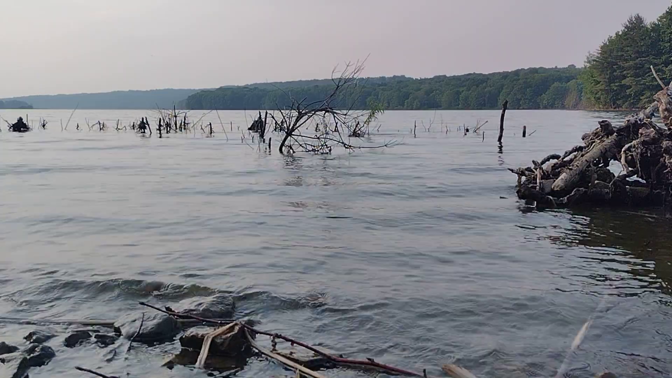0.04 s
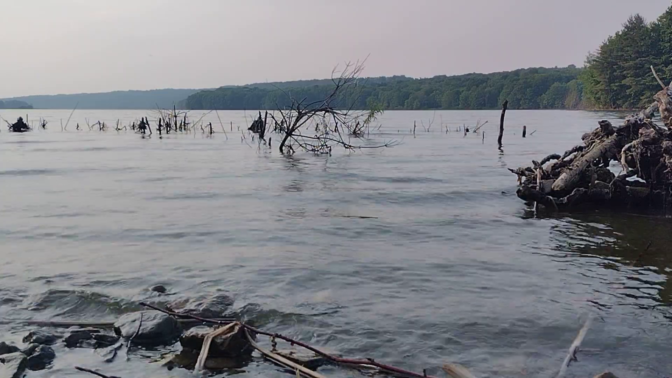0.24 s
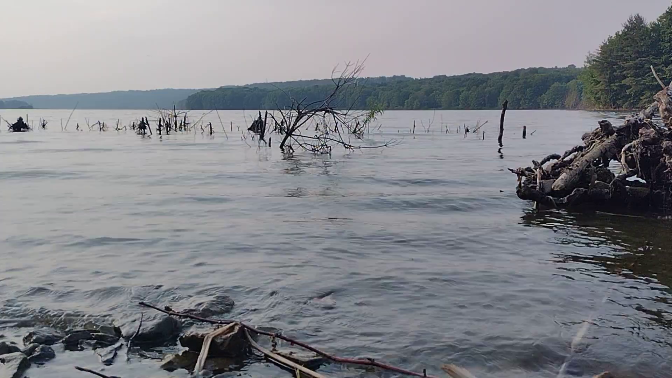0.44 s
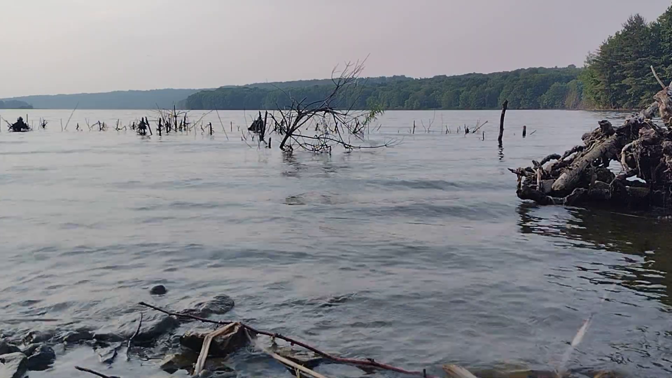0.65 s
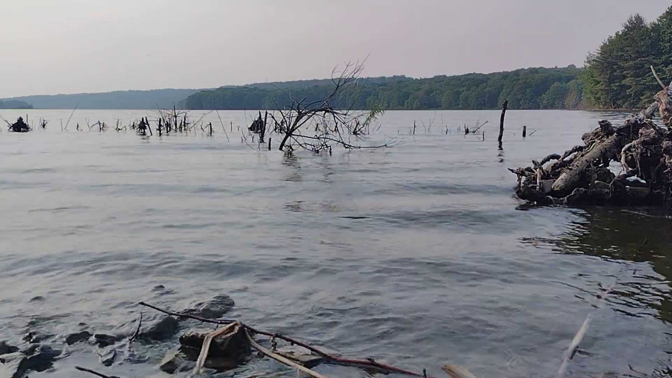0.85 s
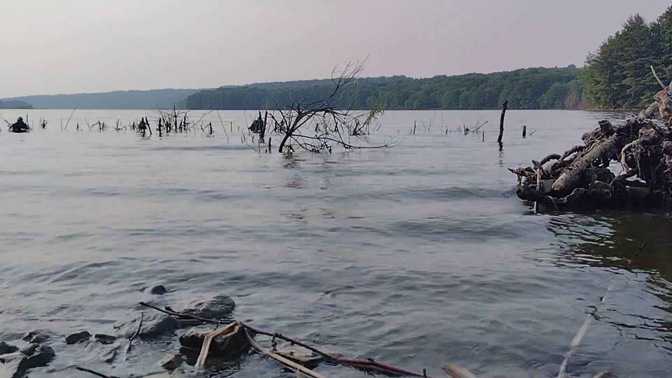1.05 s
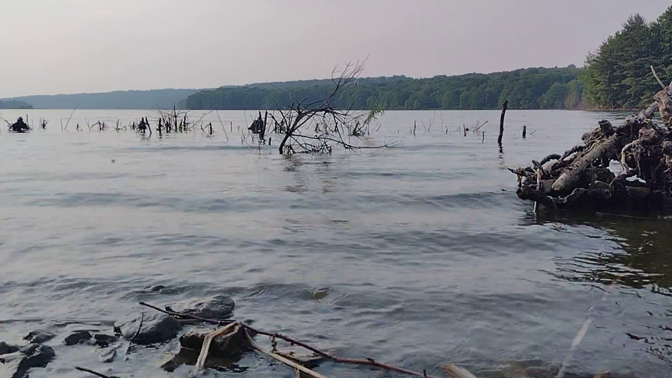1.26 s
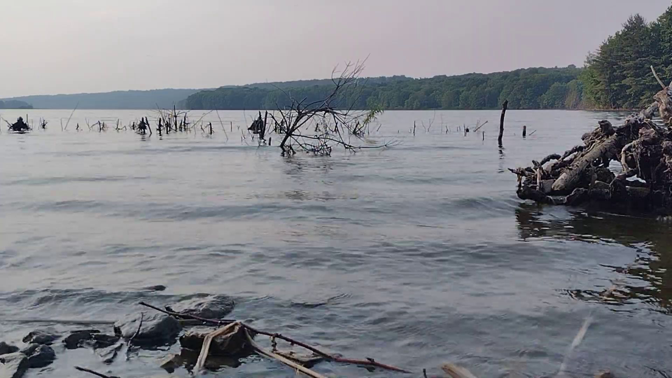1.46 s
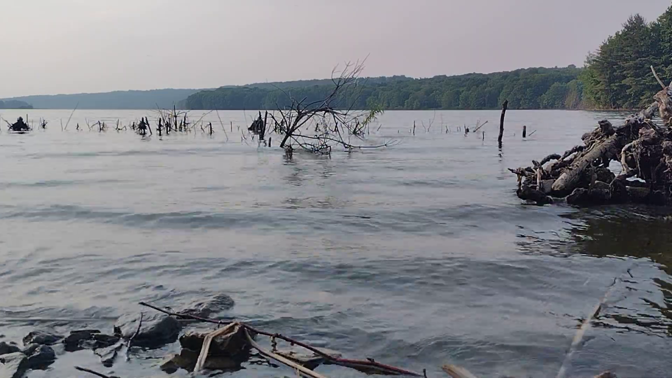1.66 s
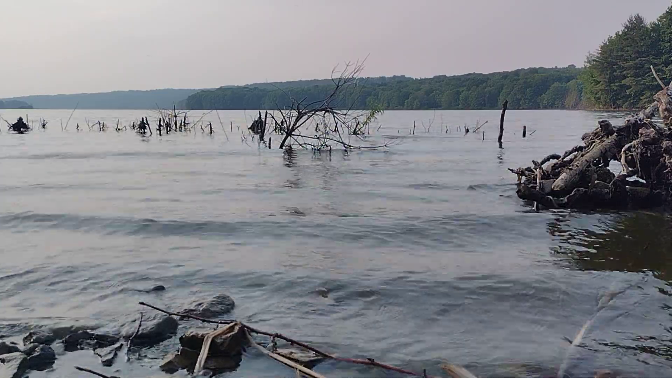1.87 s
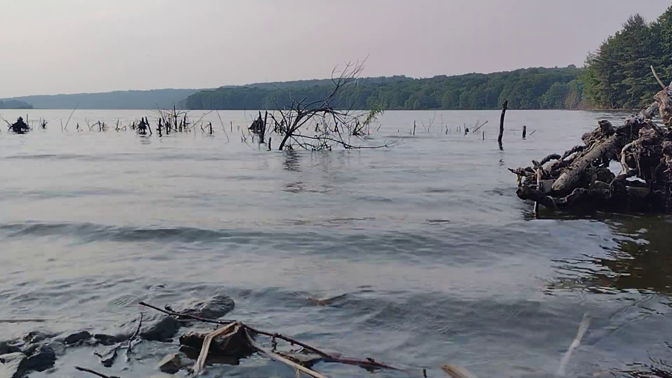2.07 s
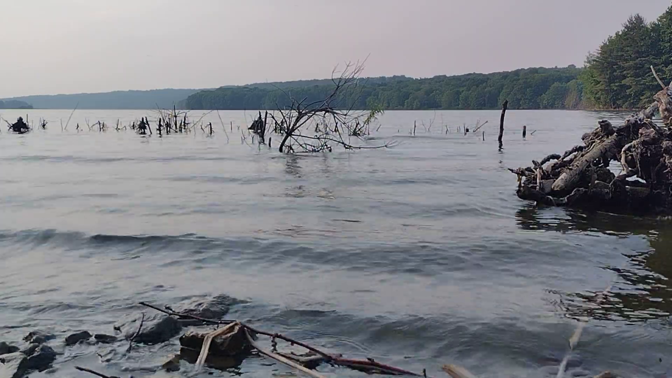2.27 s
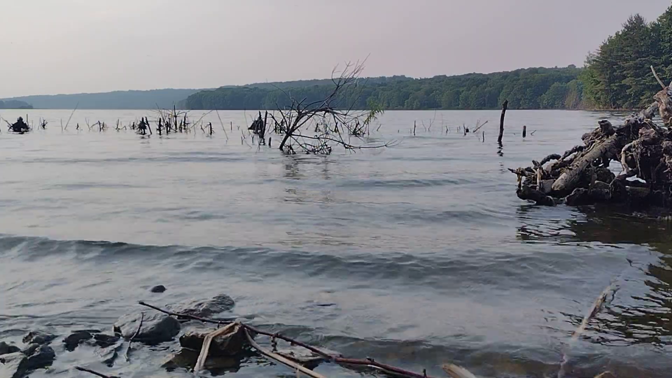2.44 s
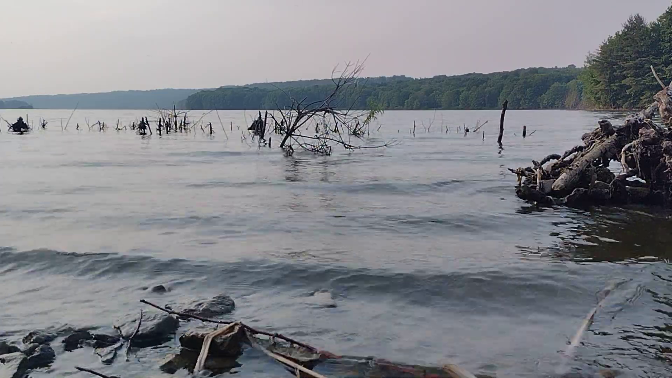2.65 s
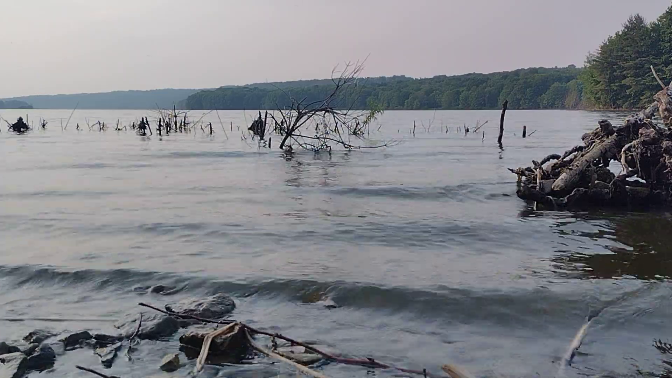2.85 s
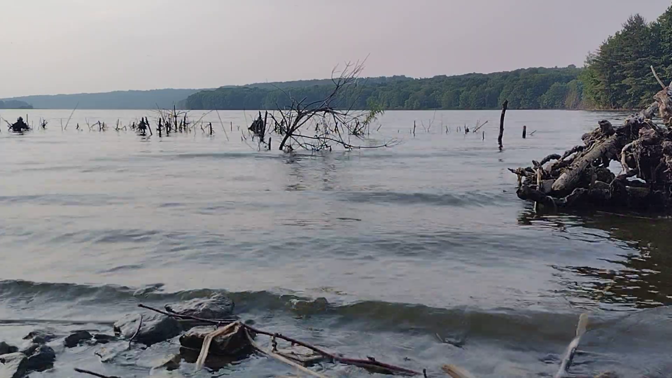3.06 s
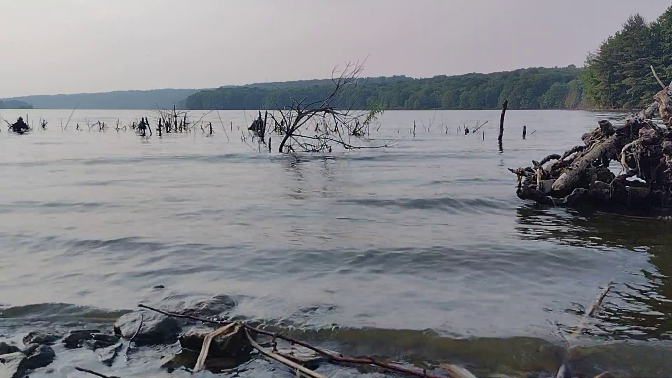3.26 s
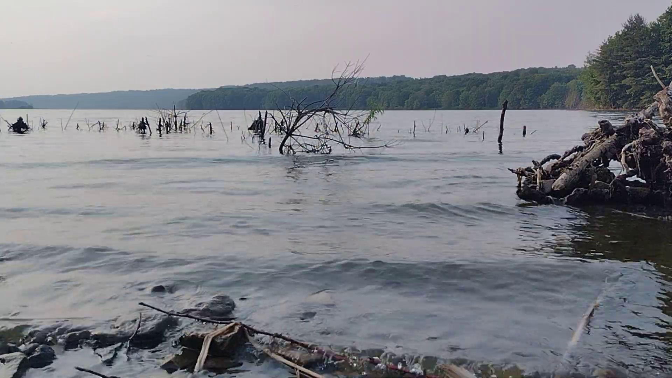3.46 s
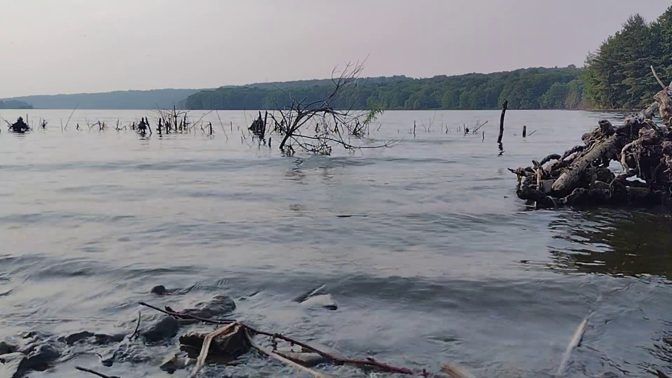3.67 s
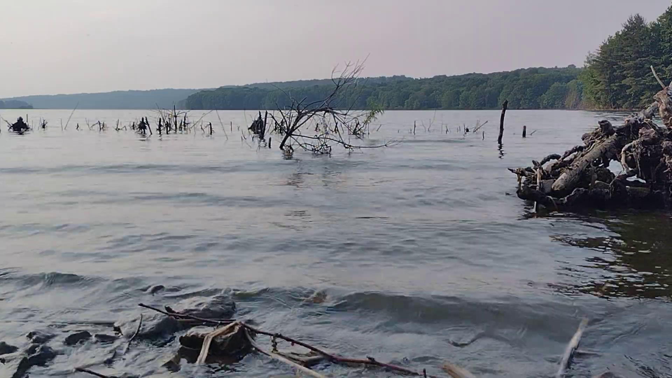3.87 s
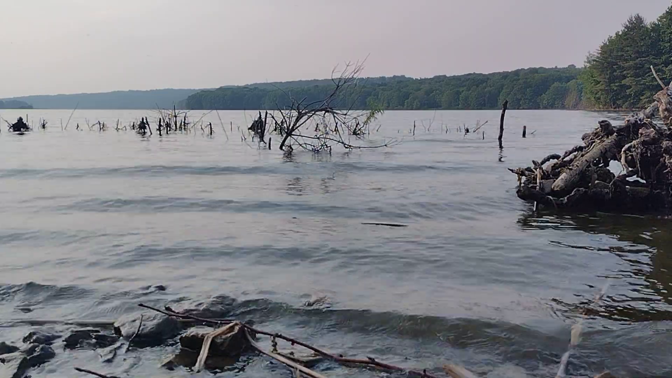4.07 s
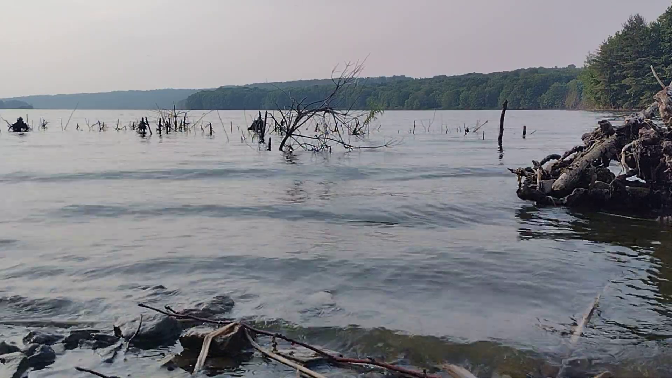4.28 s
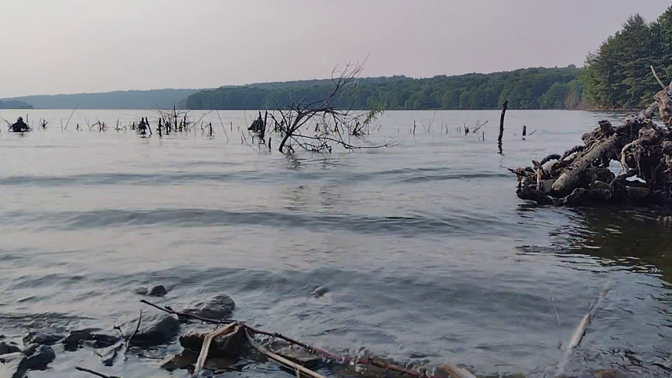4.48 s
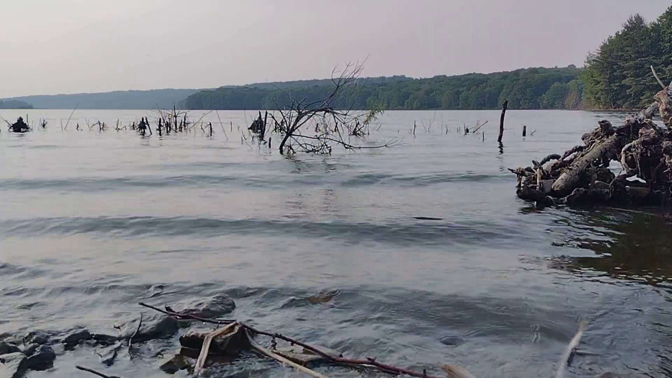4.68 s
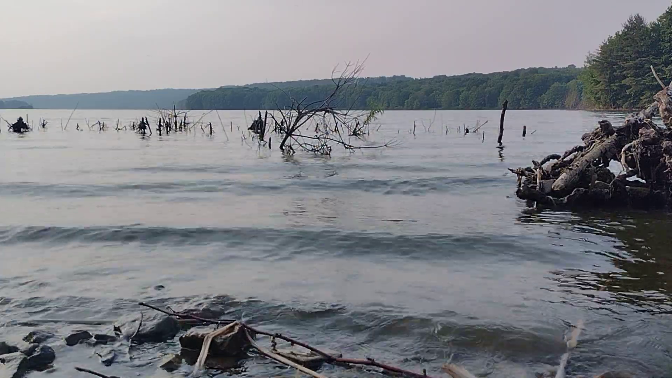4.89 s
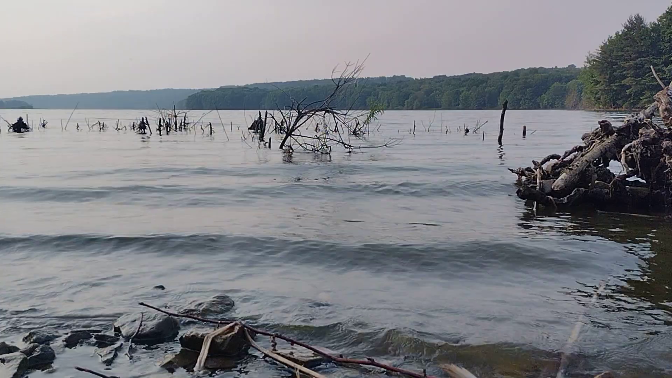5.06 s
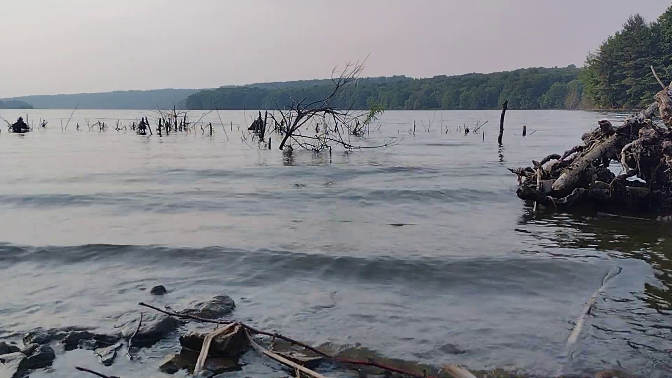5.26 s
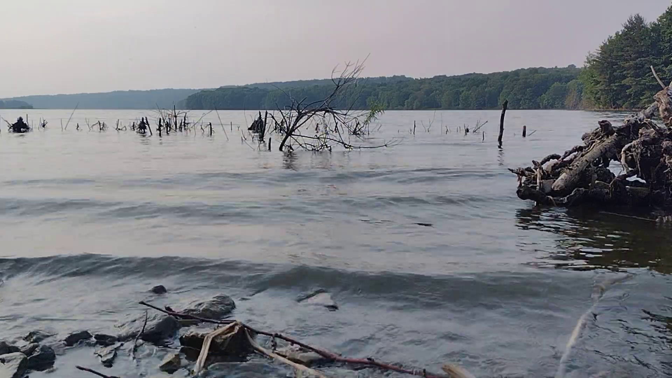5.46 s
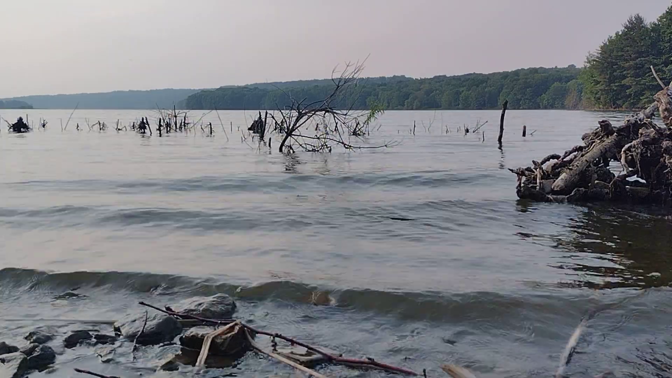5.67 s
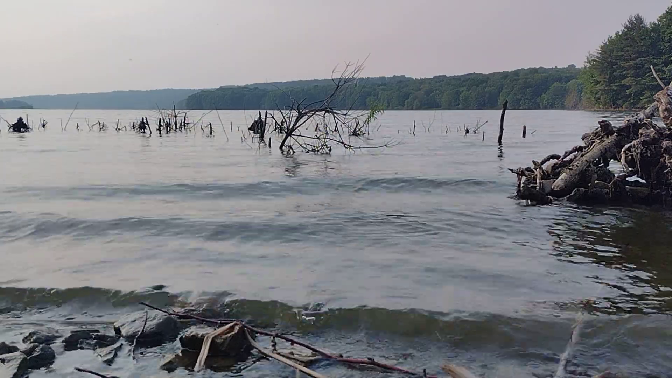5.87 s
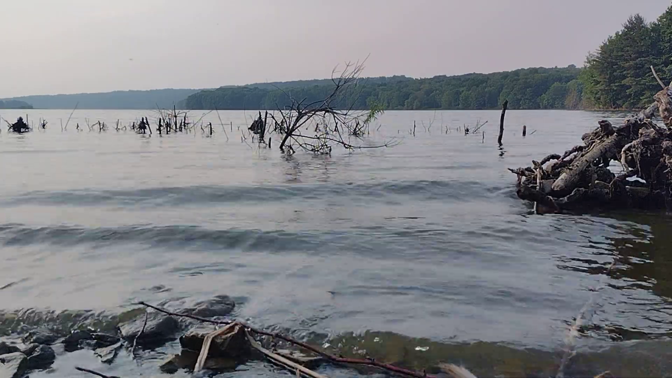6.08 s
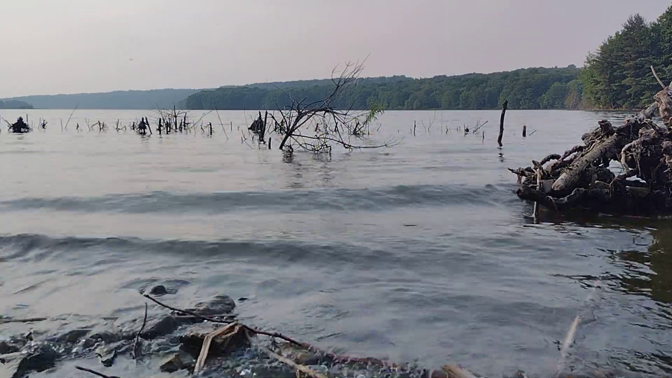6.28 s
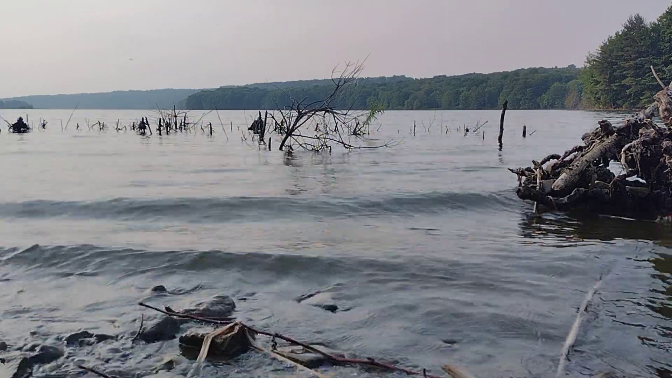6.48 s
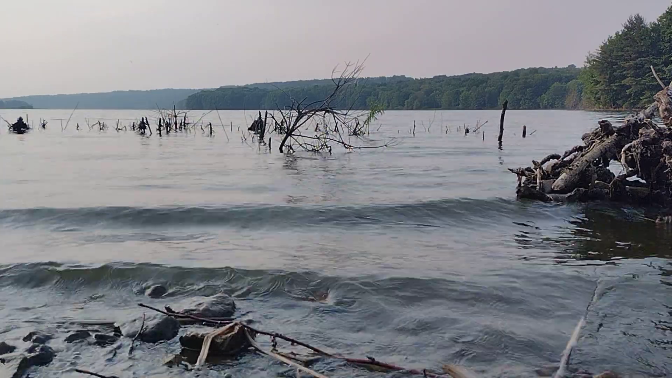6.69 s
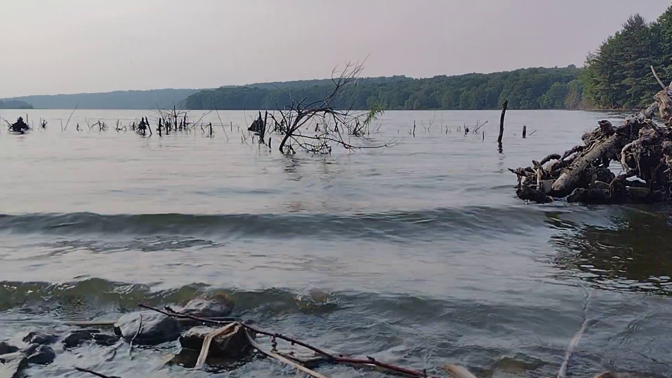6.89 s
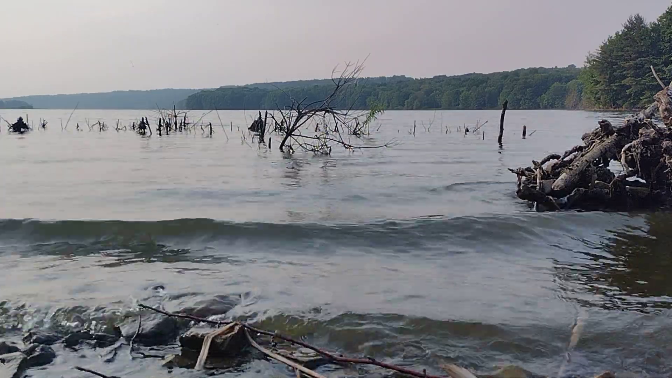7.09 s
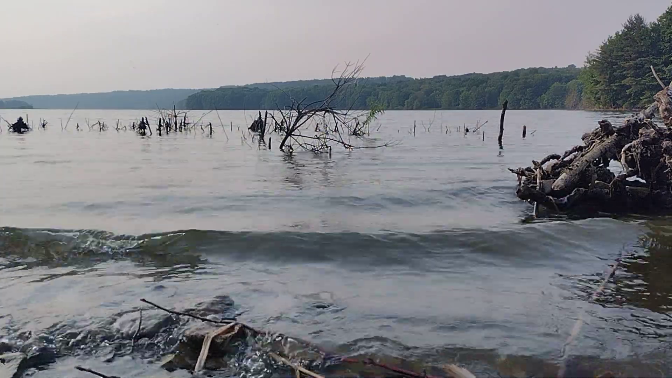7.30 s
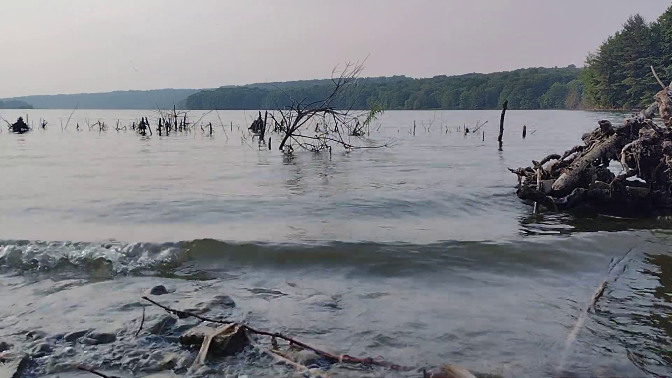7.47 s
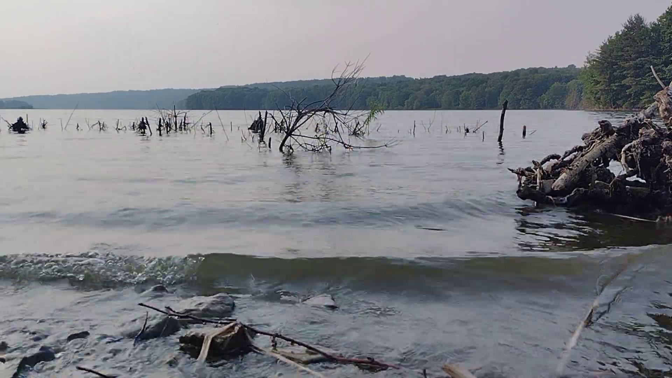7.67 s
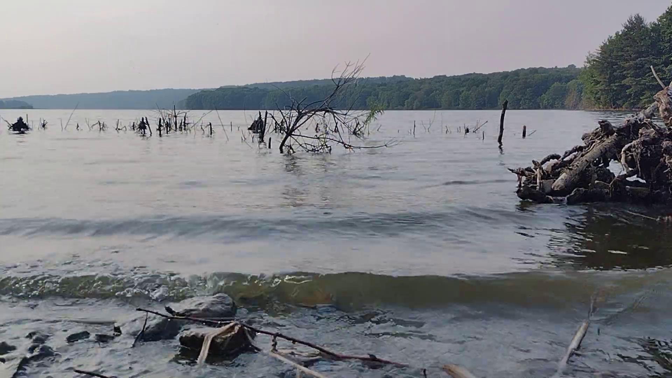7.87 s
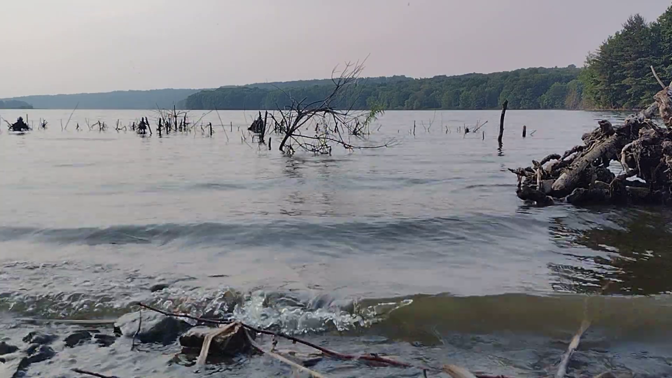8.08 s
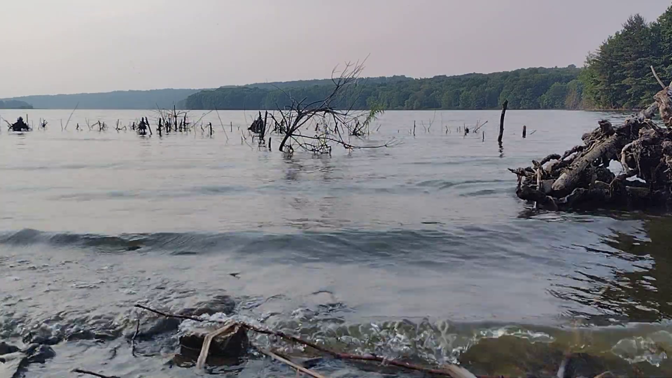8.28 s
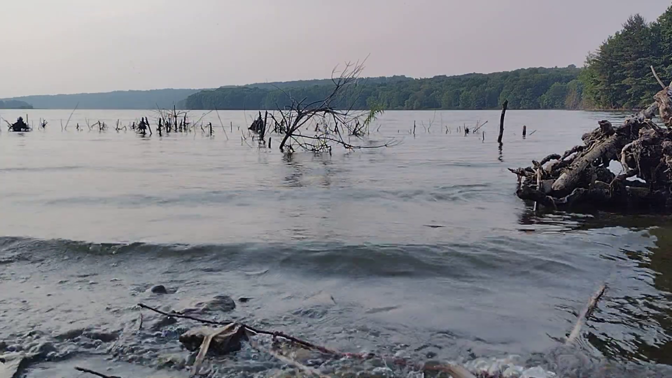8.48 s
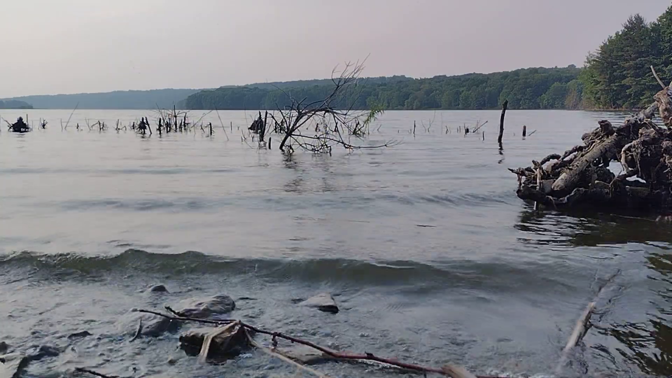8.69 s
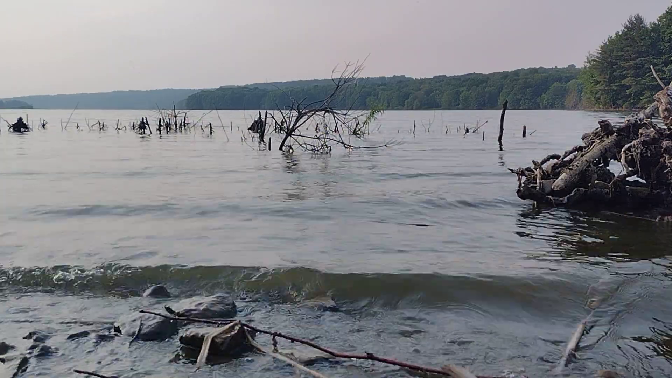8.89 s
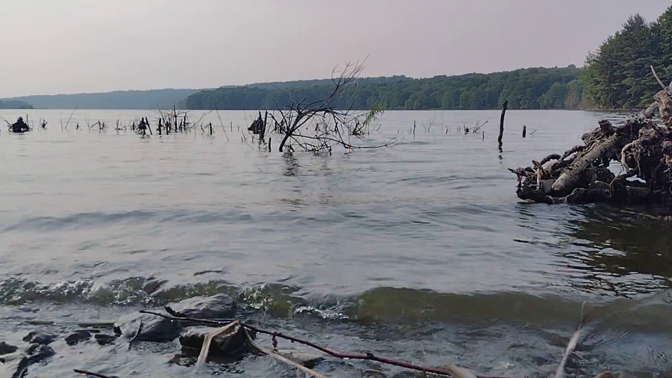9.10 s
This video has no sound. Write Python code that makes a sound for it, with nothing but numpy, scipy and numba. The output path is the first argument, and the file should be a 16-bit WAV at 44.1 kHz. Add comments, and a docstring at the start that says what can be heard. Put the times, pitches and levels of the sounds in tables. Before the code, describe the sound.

A quiet outdoor lakeshore heard from two spaced microphones near the waterline. Nearly still water clicks and drips between stones, with a faint high bird phrase early on. Short laps and rising glugs follow, pause briefly, then grow into busy, bubbly splashing with droplets ticking on rock. Behind it lie a faint unsteady motor drone and a gentle murmur of distant water.

```python
"""On a rocky lake shore, small waves run in close to two spaced microphones: trapped air pockets glug and most
rise in pitch, swarms of small bubbles gurgle and fizz as each wave breaks, and droplets tick on the stone.
Bubbles and droplets are short sines reaching the microphones a little apart in time. Behind them a small bird
calls once in whistled glides, a distant motor hums in two wavering tones over a rumble, and far water murmurs
as shaped noise."""
import sys
import numpy as np
from scipy import signal
from scipy.fft import rfft, irfft, next_fast_len
from scipy.io import wavfile
from numba import njit

SR = 44100
rng = np.random.default_rng(int(sys.argv[2]) if len(sys.argv) > 2 else 0)


def file_out(sig):
    """Save sig as 16-bit WAV at sys.argv[1]."""
    # one column per channel
    cols = np.atleast_2d(sig).T
    # limit, then scale
    lim = np.clip(cols, -1, 1)
    pcm = np.round(lim * 32767).astype(np.int16)
    wavfile.write(sys.argv[1], SR, pcm)


N = 403074

MIC_GAP_MS = 0.47   # time sound takes from one microphone to the other


def waves():
    """Swarms follow the breaking water, single bubbles and droplets stand out; nearby stones echo it all."""
    # the clearest single bubbles: (time of peak [s], swell [ms], fade [ms], start pitch [Hz], end pitch [Hz],
    # peak level [dB], left lag [ms])
    single_bubbles = [(0.399, 1.01, 2.1, 3165, 2972, -57, -.16), (0.524, 4.9, 22, 700, 735, -49.5, 0.58),
                      (0.874, 3, 10, 1140, 1034, -53, .47), (0.885, 4, 3.4, 1880, 1850, -54, 0.33),
                      (0.9, 4.7, 2.1, 2450, 2455, -56, -.15), (0.917, 0.74, 1.2, 3780, 3900, -51, -0.21),
                      (1.169, 3.4, 8.3, 1040, 1110, -51, .47), (1.299, 0.39, 0.94, 1370, 1529, -43, .26),
                      (1.298, 1, 2, 2280, 2326, -61, .22), (1.3, 0.69, 0.96, 4760, 4070, -42.5, 0.3),
                      (1.462, 2, 5.4, 765, 900, -49.5, -0.26), (2.168, 1.05, 1.9, 1550, 1507, -47, 0.23),
                      (2.221, 0.77, 1.2, 5060, 5060, -42, .02), (2.628, 3, 2.1, 2450, 2519, -55, -.17),
                      (2.64, .83, 0.33, 3740, 3860, -47, 0.26), (2.784, 0.9, 8.2, 1390, 1710, -58.5, .1),
                      (2.83, 4, 15, 875, 935, -59.5, -0.098), (2.831, 0.65, 2.4, 2220, 2370, -54.5, .11),
                      (3.165, 19, 14.5, 414, 760, -55.5, -0.32),
                      (3.245, 0.64, .51, 6740, 6460, -47.5, -.16), (3.345, 6.9, 19, 560, 870, -42.5, -0.42),
                      (3.485, 5, 9.5, 1590, 1610, -62, -0.16), (3.539, 2.4, 8.1, 1390, 1470, -55, -.06),
                      (3.545, 5, 12, 770, 910, -50, 0.31), (3.621, 0.61, 4.1, 2530, 2530, -46, -.23),
                      (3.633, 10.5, 8.5, 880, 1480, -51.5, .01),
                      (3.665, 1.01, 4.1, 3260, 3400, -54, 0.00081),
                      (3.693, 0.92, 13, 1292, 1335, -49, -0.47),
                      (3.762, 2.1, 3.5, 2260, 2600, -53.5, 0.014), (3.81, 28, 23, 665, 817, -48, 0.5),
                      (3.815, 3.1, 3.8, 1500, 1740, -50, .32), (3.866, 6.5, 9.4, 1860, 1800, -49, -.27),
                      (3.872, 1.01, 3.3, 2590, 2864, -51, -0.071), (3.923, 2.04, 4, 1637, 1550, -55, 0.27),
                      (4.175, 5.9, 3.4, 930, 1390, -41, -.33), (4.195, 1.2, .51, 6440, 6130, -49.5, .42),
                      (4.388, 5.4, 10, 456, 426, -52, 0.52), (4.41, 3.8, 8.4, 204, 260, -48, .3),
                      (4.521, 1.1, 3.7, 3280, 2780, -50, 0.19), (4.53, 1.3, 8.6, 1490, 1390, -51.5, .2),
                      (4.587, 1.3, 9.1, 1160, 1055, -50, .23), (4.615, 13, 10.6, 770, 1200, -50, -.12),
                      (4.918, 1.2, 2.8, 3340, 3445, -44, -.45), (5.336, 1.3, 13, 1580, 1580, -62, .05),
                      (4.955, 4, 15, 880, 900, -60, 0.23), (5.459, 1.4, 11, 790, 940, -52, 0.021),
                      (5.556, 1.6, 11, 1060, 1300, -51, 0.26), (5.558, 4, 11, 605, 696, -58, .28),
                      (5.68, 2.1, 12, 950, 1050, -63, 0.06), (5.862, 46, 5, 402, 723, -43.5, -.45),
                      (5.876, 5.2, 4.6, 765, 1163, -43, -0.36), (5.914, 15.5, 24, 653, 910, -50, -.4),
                      (5.93, 10.1, 47, 329, 484, -57, -.47), (6.028, 3, 8.7, 1464, 1529, -52, -0.52),
                      (6.04, 13, 34, 375, 400, -53.5, -.31), (6.07, 1.9, 23, 1420, 1380, -53.5, -.06),
                      (6.125, 7.3, 8, 600, 530, -48, -.47), (6.154, 6.9, 7.4, 1070, 1150, -47, -0.26),
                      (6.232, 1.8, 13, 636, 710, -50, 0.25), (6.256, 2.2, 8.6, 827, 780, -38.5, -0.05),
                      (6.282, .79, .51, 6339, 6130, -42, -.34), (6.315, 1.1, 6.1, 3020, 2940, -49, .01),
                      (6.386, 1.8, 24, 864, 1150, -39.5, .06), (6.39, 3.4, 22, 1410, 1530, -44, -0.14),
                      (6.485, 5, 6.3, 710, 765, -46, 0.25), (6.529, 1, .6, 4450, 4760, -41.5, 0.28),
                      (6.586, 17, 5.6, 893, 760, -41.5, 0.4), (6.592, 2.9, 2.4, 440, 507, -38, 0.27),
                      (6.669, 4.6, 3.9, 200, 237, -38.5, 0.24), (6.669, 11.4, 2.1, 416, 473, -43.5, .31),
                      (6.82, 11, 23, 444, 483, -52, 0.4), (6.874, 1.01, .9, 3340, 3430, -38, 0.23),
                      (6.873, 1.7, 2.6, 2200, 2000, -34, .25), (6.882, 0.99, 2.2, 6615, 7028, -44, -.32),
                      (6.899, 1.01, 0.77, 3320, 3180, -23, -0.36),
                      (6.898, 0.58, 1.1, 2700, 2830, -32, -0.29), (6.897, 0.89, 5.2, 6940, 6133, -42, -.34),
                      (6.922, 7.9, 40, 290, 364, -39.5, -.34), (6.935, 4.17, 22, 614, 750, -31, -0.57),
                      (6.939, 0.69, 0.47, 6100, 5560, -33, -0.366),
                      (6.988, 1.2, 11.6, 2660, 2810, -40, -0.34), (6.99, 24, 14.9, 567, 994, -36, 0.079),
                      (6.993, 1.7, 24, 970, 1110, -28, -0.44), (7.005, 1.82, 1.4, 2660, 2880, -38, 0.01),
                      (7.025, 15, 37, 252, 279, -50, -0.35), (7.107, 7.7, 3.3, 595, 674, -34, -0.39),
                      (7.108, 7.2, 84, 384, 943, -36.5, -0.19), (7.182, 5.4, 3, 1480, 1630, -42.5, -.04),
                      (7.207, 4.16, 31, 459, 557, -39.5, -0.11),
                      (7.258, 2.5, 4.4, 1440, 1292, -36.5, -0.13), (7.436, 6.2, 22, 497, 413, -45, -.13),
                      (7.621, 14, 8.5, 920, 1120, -33, -0.26), (7.651, 11.3, 31, 301, 412, -36, -0.2),
                      (7.763, 22, 17, 542, 694, -43, -0.17), (7.777, 8.9, 27, 368, 463, -32.5, -0.38),
                      (7.816, 4.2, 5.2, 234, 242, -31.5, .36), (7.823, 1.01, 1.9, 3620, 3810, -33, -0.27),
                      (8.016, 5.7, 3.9, 590, 510, -27.5, -0.44), (8.024, 7.5, 8.1, 436, 486, -30.5, -0.24),
                      (8.139, 5.9, 31, 624, 736, -35.5, -0.3), (8.17, 0.81, 3.6, 2800, 2770, -29.5, -.02),
                      (8.274, 1.9, 7.9, 2550, 2900, -35.5, -0.1), (8.315, 12.3, 41, 527, 547, -41, -0.027),
                      (8.358, 1.7, 3.9, 980, 895, -28.5, -.11), (8.395, 3.6, 5.9, 1295, 1380, -25, .07),
                      (8.4595, 1.55, 11, 776, 603, -23, -0.045),
                      (8.4602, 1.2, 9.8, 1000, 1710, -21.5, 0.054),
                      (8.462, 1.1, 9.2, 2320, 2400, -34.5, -0.056),
                      (8.469, 5.6, 59, 305, 318, -26.5, 0.084), (8.54, 1.01, 1.4, 3500, 3260, -29.5, .22),
                      (8.552, 14, 23, 351, 490, -36.5, -0.0058), (8.595, 9.1, 5.4, 530, 506, -32, .2),
                      (8.614, 1.04, .96, 2730, 2550, -22.5, 0.14), (8.619, 4, 21, 1296, 1470, -33, 0.027),
                      (8.673, 5.1, 2.8, 625, 840, -36, 0.57), (8.681, 15.7, 7.9, 405, 590, -35, .36),
                      (8.72, 6, 62, 210, 273, -42, .47), (8.911, 12, 18, 1370, 1304, -37, 0.44),
                      (8.913, 22, 86, 416, 470, -42, 0.57), (8.962, 1.56, 0.88, 1820, 2040, -25.5, -0.25),
                      (8.963, 4.5, 7.8, 244, 254, -32.5, .34)]
    # swarms of big, middle and small bubbles and spray: (lowest pitch [Hz], highest pitch [Hz], rate [1/s],
    # typical ring until 26 dB down [cycles], mean pitch rise [natural log], level spread [dB], tilt [dB/octave])
    swarm_kinds = [(324.6, 620, 280, 9.33, 0.251, 2.5, 11.5), (644, 1900, 850, 12.28, 0.2004, 3.5, -1),
                   (1896, 3225, 1400, 11.6, 0.106, 4, 2), (2970, 20100, 3200, 4.9, 0.084, 2, -3.06)]
    pan_db = np.full(len(single_bubbles), 1.5)   # a little louder on the left
    single = bubbles(np.c_[single_bubbles, pan_db])

    clumps_db = 2.28 * drift(29.0)
    gains = wash()
    spray_gain = gains[-1]
    swarms = sum(swarm(gain, clumps_db, *kind) for gain, kind in zip(gains, swarm_kinds))
    water = single + splats(droplets(spray_gain)) + swarms

    tail_s = np.arange(SR // 8) / SR
    stones = rng.standard_normal((2, SR // 8)) * amp(-60 * tail_s / 0.092 - 33.5)   # 60 dB down in 92 ms
    return water + signal.fftconvolve(water, stones, axes=1)[:, :N]


def wash():
    """Gain of each swarm: every surge rises fast, holds and drains away over a trickle between the stones."""
    # wavelets breaking: (start of hold [s], hold [s], level of middle bubbles [dB],
    # big bubbles over middle [dB], spray over middle [dB])
    surges = [(0.0, 0.14, -71, 5, -11), (0.488, 0.14, -75, -2, -8), (0.684, 0.2, -73.5, 7.5, -3),
              (1.15, 0.055, -87, 16.5, 1.1), (1.39, 0.14, -78.5, 8.5, -0.5), (1.81, 0.18, -81.5, 12.5, 3.5),
              (2.327, 0.057, -85, 12, 6), (3.124, 0.22, -77.5, 8.5, 1.5), (3.555, 0.14, -60.5, -18, -11.5),
              (3.746, 0.12, -63, -23, -10.5), (3.922, 0.025, -74.5, 5, 5), (4.147, 0.079, -67, 0, -9),
              (4.39, 0.025, -84, 16, 11), (4.568, 0.11, -65, -22, -9.5), (4.87, 0.055, -79, -12, 4),
              (5.37, 0.13, -71.5, -1, -25), (5.843, 0.21, -71.5, 6, -7), (6.074, 0.066, -59, -4.5, -11.5),
              (6.271, 0.057, -50.5, -11, -13.5), (6.38, 0.041, -50.5, -9.5, -16),
              (6.579, 0.048, -51, -5.5, -9.5), (6.747, 0.049, -57.5, -3, -6), (6.902, .12, -49, -1, -9.5),
              (7.163, 0.07, -49.5, -4.5, -25), (7.328, 0.11, -50, -19, -25), (7.604, 0.08, -43, 2.5, -13.5),
              (7.743, 0.095, -42, -0.5, -15), (7.993, 0.1, -40, -4.5, -14), (8.212, 0.21, -43.5, -8.5, -17),
              (8.431, 0.075, -40.5, -4, -15), (8.554, 0.11, -36.5, -19, -16.5),
              (8.67, 0.056, -43.5, -1.5, -14), (8.797, .05, -42, -4, -14.5),
              (8.898, 0.065, -43.5, -2.6, -16.5)]
    # water trickling between the stones: (time [s], level of middle bubbles [dB])
    trickle = [(0.0, -69), (1.2, -73.5), (2.1, -72.5), (2.9, -75), (3.9, -69.5), (5.1, -74.5), (6.0, -70.5),
               (6.8, -62.5), (7.5, -52), (8.2, -53.5), (8.95, -62), (9.14, -55.5)]
    rise_db_per_s, fall_db_per_s = 279, 155
    spray_lingers = 0.75   # the spray falls at this share of the rate
    fall = fall_db_per_s * np.array([[1], [1], [1], [spray_lingers]])

    t = np.arange(0, N + 64, 64) / SR   # a coarse grid is enough for the gains
    trickle_db = np.interp(t, *np.transpose(trickle))
    power = amp(mix_db(trickle_db, big_db=-4, spray_db=-5.9)) ** 2
    for start, hold, level_db, big_db, spray_db in surges:
        before, after = np.maximum(start - t, 0), np.maximum(t - start - hold, 0)
        loss_db = rise_db_per_s * before + fall * after
        surge_db = mix_db(level_db, big_db, spray_db)[:, None] - loss_db
        power += amp(np.maximum(surge_db, -200)) ** 2
    return [np.interp(np.arange(N) / SR, t, np.sqrt(p)) for p in power]


def mix_db(level_db, big_db, spray_db):
    """Levels of big, middle and small bubbles and spray; the small ones lean toward the spray."""
    small_db = 0.59 * spray_db - 1
    return np.array([level_db + big_db, level_db, level_db + small_db, level_db + spray_db])


def swarm(gain, clumps_db, low_hz, high_hz, per_s, cycles, rise, spread_db, tilt_db):
    """Random bubbles, louder in clumps; each rings some cycles and rises; the whole follows the gain."""
    draw = rng.random((40000, 7))[:int(per_s * N / SR)]
    s = draw[:, 0] * (N - 1) / SR
    hz = low_hz * (high_hz / low_hz) ** draw[:, 1]
    end_hz = hz * np.exp(2 * rise * draw[:, 5])
    # one fade is 13 dB, half of the ring
    fade_ms = 1000 * cycles / hz * .5 * amp(13.35 * (draw[:, 2] - .5))
    level_db = clumps_db[(s * SR).astype(int)]
    level_db = level_db - spread_db * np.log(draw[:, 3] + 0.0088)   # a few stand far out
    level_db += tilt_db * np.log2(hz / low_hz)
    pan_db = 8 * (draw[:, 6] - .5) + 1
    rows = np.c_[s, .15 * fade_ms, fade_ms, hz, end_hz, level_db, lag_ms(s, draw[:, 4]), pan_db]
    return gain * rms_one(bubbles(rows))


def droplets(spray_gain):
    """Listed droplets smack on stone, then random lesser ones follow the strength of the spray."""
    # (time [s], level [dB], treble share [dB])
    listed_drops = [(0.396, -49, -21), (0.8828, -48.5, -32), (1.2979, -51, -15), (2.166, -48.5, -20),
                    (2.2208, -54, -20), (2.6384, -62, -32), (3.1677, -49, -26), (3.2445, -59, -27),
                    (3.2685, -62, -8), (3.5124, -65, -7), (3.528, -46.5, -14), (3.5906, -47, -17),
                    (3.6193, -53, -22), (3.6655, -66, 1), (4.066, -57, -2), (4.1572, -49, -28),
                    (4.1923, -53, -15), (4.5592, -48.5, -17), (4.91, -59, -28), (5.8292, -49, -26),
                    (5.8601, -51, -29), (6.232, -47, -18), (6.2806, -46, -33), (6.314, -44, -30),
                    (6.3774, -44, -21), (6.4777, -43, -19), (6.5247, -50, -4), (6.548, -46, -13),
                    (6.7306, -55, -22), (6.759, -43.5, -8.5), (6.8718, -33, -22), (6.8974, -29, -28),
                    (6.94, -39, -14), (7.1588, -44, -12), (7.183, -41, -18), (7.2529, -40, -15),
                    (7.3033, -54, -16), (7.3347, -63, -3), (7.377, -40, -24), (7.4512, -41, -30),
                    (7.5786, -41, -31), (7.701, -38, -28), (7.728, -37, -32), (7.7707, -43, -12),
                    (7.8216, -35, -36), (7.8835, -55, -25), (7.9284, -54, -16), (7.9598, -54, -4),
                    (7.9838, -34.5, -27), (8.014, -41, -9), (8.0785, -44, -17), (8.1244, -58, -18),
                    (8.1554, -38.5, -38), (8.1695, -68, -31), (8.2104, -40, -24), (8.3406, -35.5, -29),
                    (8.4337, -53, -5), (8.48, -37, -15.5), (8.5385, -39, -25), (8.6043, -51, 1.5),
                    (8.6409, -43, -1.5), (8.734, -44.5, -33), (8.8896, -60, -24), (8.927, -40.5, -35)]
    per_s = 30
    draw = rng.random((1000, 3))[:int(per_s * N / SR)]
    s = draw[:, 0] * (N - 1) / SR
    spray_db = 20 * np.log10(spray_gain[(s * SR).astype(int)])
    level_db = spray_db + 7.5 - 2.5 * np.log(draw[:, 1] + 0.064)
    treble_db = -13.0 + 8 * (draw[:, 2] - .5)
    return np.r_[listed_drops, np.c_[s, level_db, treble_db]]


def splats(rows):
    """Each droplet is a tick of six very short rings, three dull and three bright."""
    rings = 6
    s, drop_db, treble_db = np.repeat(rows, rings, axis=0).T
    draw = rng.random((len(s), 3))
    place = np.repeat(rng.random((len(rows), 2)), rings, axis=0)   # the rings of a droplet share one place
    index = np.arange(len(s))
    bright = index % 2
    octaves = 1.07 * (index // 2 % 3 + draw[:, 0]) / 3
    hz = np.where(bright, 7500, 3000) * 2 ** octaves
    level_db = drop_db + np.where(bright, treble_db + 8.5, -3)
    level_db += 8 * (draw[:, 1] - .5)
    fade_ms = np.full(len(s), .7)
    peak_s = s + .0015 * draw[:, 2] + .001
    pan_db = 8.0 * (place[:, 1] - .5)
    return bubbles(np.c_[peak_s, .7 * fade_ms, fade_ms, hz, hz, level_db, lag_ms(s, place[:, 0]), pan_db])


def lag_ms(s, chance):
    """Left lag of a sound born near the breaking place, no longer than the microphone gap."""
    # where along the shore the water breaks: (time [s], left lag [ms])
    breaking_place = [(0, -0.36), (3.4, -0.3), (3.6, 0.058), (4.0, 0.45), (4.2, -0.17), (5.7, -0.23),
                      (6.2, -0.22), (6.35, 0.26), (6.85, 0.248), (6.92, -0.35), (8.3, -0.126), (8.4, 0.13),
                      (9.14, 0.58)]
    lag = np.interp(s, *np.transpose(breaking_place)) + 0.47 * (chance - .5)
    return np.clip(lag, -MIC_GAP_MS, MIC_GAP_MS)


def bubbles(rows):
    """Stereo bubbles from rows of peak [s], swell, fade [ms], two pitches [Hz], level [dB], lag [ms], pan [dB]."""
    out, rows = np.zeros((2, N)), np.array(rows, float)
    rows[:, [1, 2, 6]] = rows[:, [1, 2, 6]] / 1000   # ms to s
    rows[:, 1:3] = np.maximum(rows[:, 1:3], 5e-5)
    rows[:, [5, 7]] = amp(rows[:, [5, 7]])
    add(out, rows, SR, 1.5)
    return out


@njit
def add(out, rows, sr, bend):
    """Each bubble is a sine 13 dB down one swell before and one fade after its peak; its pitch moves late."""
    for peak, swell, fade, hz0, hz1, gain, lag, pan in rows:
        for side in range(2):   # left, right
            at = peak + lag * (.5 - side)
            g = gain * pan ** (.5 - side)
            first = int((at - 1.13 * swell) * sr)
            turns = hz0 * (first / sr - at + swell)
            for i in range(first, min(int((at + 3 * fade) * sr), out.shape[1])):
                t = i / sr - at
                size = np.exp(-1.5 * t / fade) if t > 0 else max(1 - .78 * (t / swell) ** 2, 0.)
                # the end pitch falls at age 1; the glide stops a little later, as the bubble opens
                age = min(max((t + swell) / (swell + fade), 0.), 1.2)
                turns += hz0 * (hz1 / hz0) ** (age ** bend) / sr
                if i >= 0:
                    out[side, i] += g * size * np.sin(2 * np.pi * turns)


def bird():
    """Whistled strokes, each a glide and a softer held end, with a smear of echoes from the trees."""
    # (start [s], glide [s], hold [s], start pitch [Hz], end pitch [Hz], rms level before shaping and pan [dB])
    strokes = [(1.19, 0.025, .002, 6450, 5400, -83), (1.245, 0.016, .012, 5000, 5500, -81),
               (1.387, 0.045, .002, 7540, 5100, -76), (1.442, 0.023, 0.06, 4780, 5620, -70),
               (1.533, 0.036, .004, 5200, 4530, -75), (1.573, 0.038, 0.016, 4800, 6370, -69.5),
               (1.673, 0.034, .004, 5100, 4700, -72), (1.715, 0.042, 0.018, 4860, 6400, -68),
               (1.822, 0.047, 0.0035, 7430, 4820, -70.5)]
    out, t = np.zeros(N), np.arange(N) / SR
    for start, glide, hold, start_hz, end_hz, level_db in strokes:
        edge = np.clip(np.minimum(t - start, start + glide + hold - t) / 0.0043, 0, 1)
        hz = np.interp(t, [start, start + glide], [start_hz, end_hz])
        swell_in_db = -9 * np.clip(1 - (t - start) / (0.87 * glide), 0, 1) ** 2
        hold_drop_db = -20 * np.clip((t - start - glide) / 0.015, 0, 1)
        gain = np.sqrt(2) * edge * amp(level_db + swell_in_db + hold_drop_db)
        out += gain * np.sin(2 * np.pi * np.cumsum(hz) / SR)
    tail_s = np.arange(SR // 2) / SR
    trees = rng.standard_normal((2, SR // 2)) * amp(-60 * tail_s / 0.71 - 28)   # 60 dB down in 0.71 s
    return out * amp([[2.5], [-1.5]]) + signal.fftconvolve(out[None], trees, axes=1)[:, :N]


def motor():
    """A distant motor: two wavering tones over a low band of rumble noise, each with its own level curve."""
    # levels before pan: (time [s], lower tone [dB], upper tone [dB], rumble [dB])
    motor_levels = [(0.0, -72, -81, -71), (0.61, -77, -80, -75), (0.71, -70, -72, -72.5),
                    (1.65, -88, -81, -74.5), (2.31, -64, -73, -69), (2.7, -65, -83, -68),
                    (2.75, -64, -69, -70.5), (3.54, -57, -66, -63), (6.01, -63.5, -64, -64.5),
                    (7.3, -55, -63, -58), (7.97, -57, -57, -60), (8.38, -68, -68, -61),
                    (9.06, -71, -62.5, -61.5), (9.14, -78, -81, -66)]
    low_db, high_db, rumble_db = in_time(motor_levels)
    # (frequency [Hz], relative level [dB])
    rumble_spectrum = [(30, -35), (52, -1.5), (110, 0), (170, -4.0), (260, -25.0), (600, -94)]
    noise = along_shore(rumble_spectrum, left_db=-0.5, right_db=5.0, scatter_db=15.5)
    rumble = amp(rumble_db) * noise * amp([[.45], [-.45]])
    tones = hum(97, low_db) + hum(122.6, high_db)
    return rumble + tones * amp([[.5], [-.5]])


def hum(hz, level_db):
    """A motor tone that wavers in level and pitch over the long way across the lake."""
    waver_db = 1.5 * drift(8)
    waver_hz = 1.58 * drift(5.65)
    turns = np.cumsum(hz + waver_hz) / SR
    return np.sqrt(2) * amp(level_db + waver_db) * np.sin(2 * np.pi * turns)


def far_water():
    """Murmur of far water and air: shaped noise along the shore, slowly swelling."""
    # (frequency [Hz], relative level per Hz [dB])
    far_spectrum = [(15, -42), (25, -20), (127, 2.5), (270, -2), (451, -5.5), (516, -7), (677, -13),
                    (988, -21), (1370, -20.5), (1890, -22), (2990, -29), (4370, -22), (9840, -32),
                    (14800, -32), (16000, -30.5)]
    swell_db = .8 * drift(2)
    noise = along_shore(far_spectrum, left_db=2.5, right_db=-5.0, scatter_db=0.5)
    return amp(-68.5 + swell_db) * noise * amp([[.45], [-.45]])


def along_shore(spectrum, left_db, right_db, scatter_db):
    """Noise arriving end-on from both shores, plus scatter that differs at each microphone; rms 1."""
    size = next_fast_len(N)
    hz = np.arange(size // 2 + 1) * SR / size + 1e-3
    left, right, *own = rfft(rng.standard_normal((4, size)))
    left, right = amp(left_db) * left, amp(right_db) * right
    late = np.exp(-2j * np.pi * hz * MIC_GAP_MS / 1000)   # delay to the farther microphone
    both = np.array([left + right * late, left * late + right])
    scatter = amp(scatter_db) * hz / (hz + 400) * np.array(own)   # long waves reach both alike
    spectrum_hz, spectrum_db = np.array(spectrum).T
    colour = amp(np.interp(np.log(hz), np.log(spectrum_hz), spectrum_db))
    return rms_one(irfft(colour * (both + scatter), size)[:, :N])


def drift(rate):
    """Slow chance of spread about 1 from smoothed random knots; a higher rate wanders faster."""
    knots_per_s = 40
    knots = rng.standard_normal(int(N / SR * knots_per_s) + 3)
    r = np.exp(-2 * np.pi * rate / knots_per_s)
    slow = signal.filtfilt([1], [1, -r], knots)
    return np.interp(np.arange(N) / SR * knots_per_s, np.arange(len(slow)), rms_one(slow - slow.mean()))


def in_time(rows):
    """Columns of a curve table at every sample."""
    s, *columns = np.transpose(rows)
    return [np.interp(np.arange(N) / SR, s, c) for c in columns]


def rms_one(x):
    """Scale to rms 1."""
    return x / np.sqrt(np.mean(x ** 2) + 1e-20)


def amp(db):
    """dB to gain."""
    return 10 ** (np.asarray(db) / 20)


def scene():
    """Waves close by, then bird, motor and the far murmur."""
    return waves() + bird() + motor() + far_water()


def record(dry):
    """The microphones lose the deepest bass below 42 Hz; the top is cut steeply above 15.9 kHz."""
    dry = signal.sosfilt(signal.butter(3, 42, "high", fs=SR, output="sos"), dry)
    return signal.sosfilt(signal.ellip(12, .3, 60, 15900, fs=SR, output="sos"), dry)


dry = scene()
out = record(dry)
file_out(out)
```